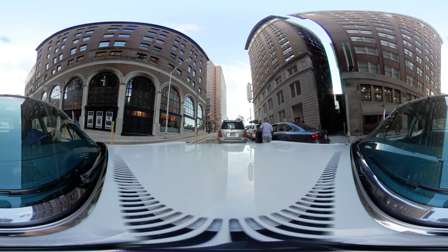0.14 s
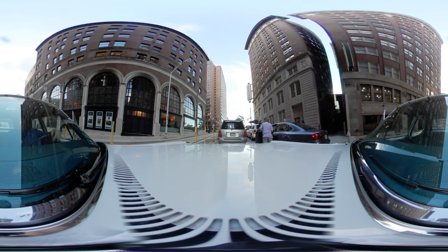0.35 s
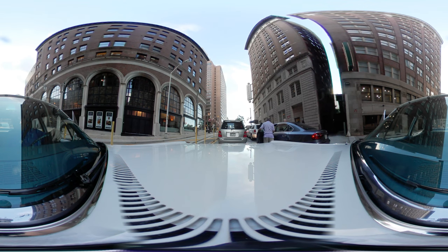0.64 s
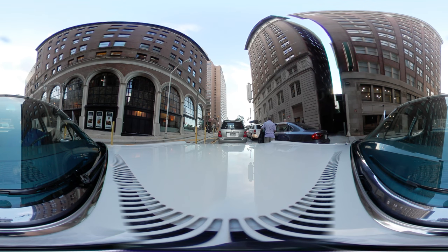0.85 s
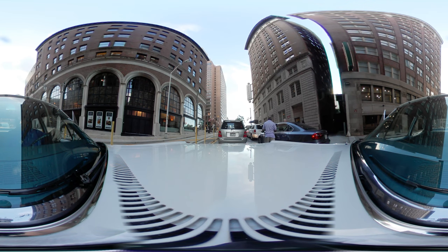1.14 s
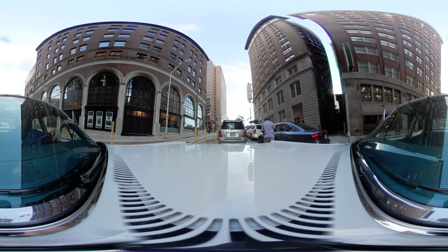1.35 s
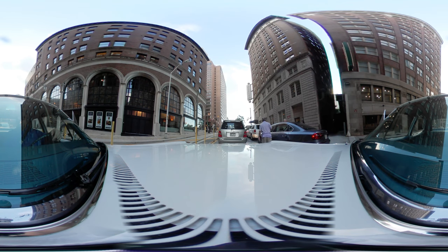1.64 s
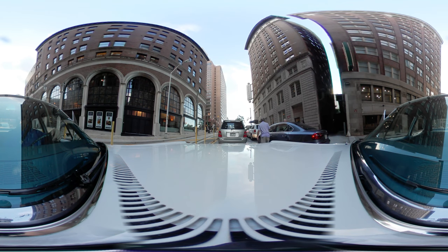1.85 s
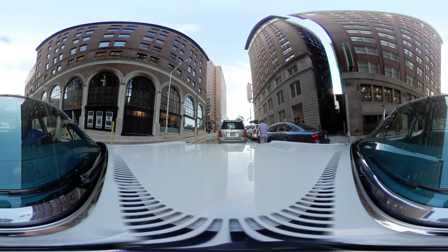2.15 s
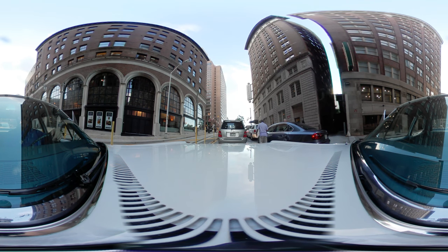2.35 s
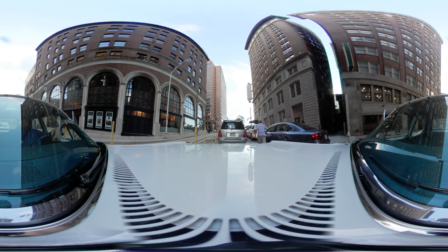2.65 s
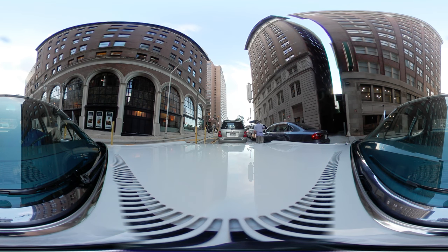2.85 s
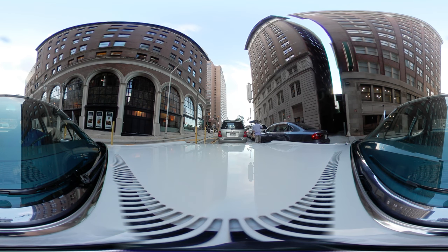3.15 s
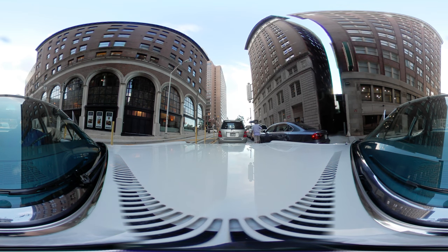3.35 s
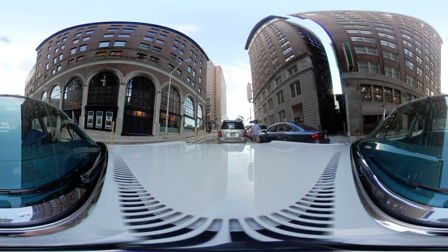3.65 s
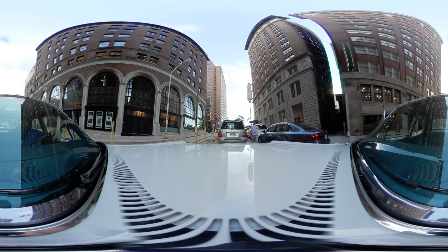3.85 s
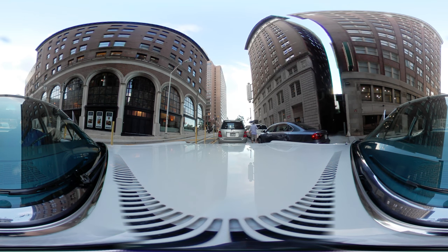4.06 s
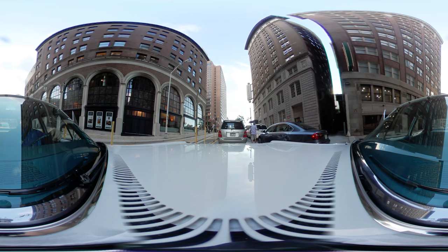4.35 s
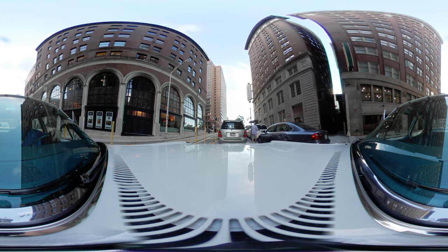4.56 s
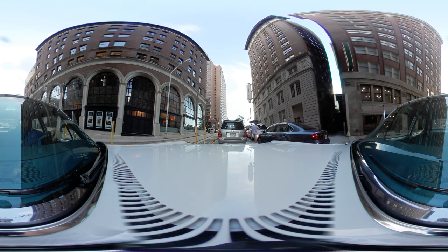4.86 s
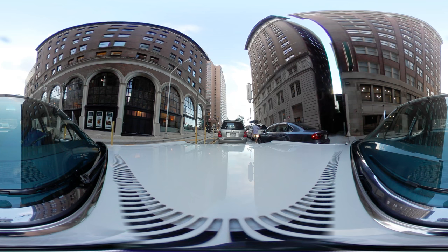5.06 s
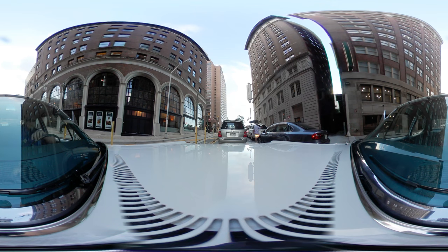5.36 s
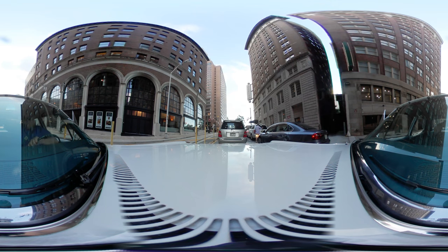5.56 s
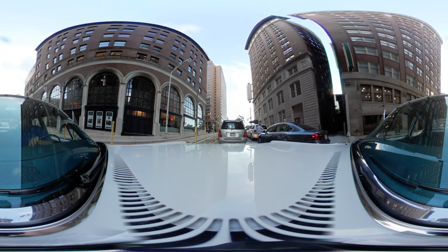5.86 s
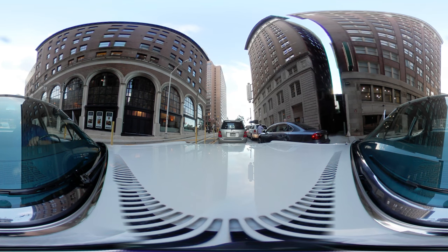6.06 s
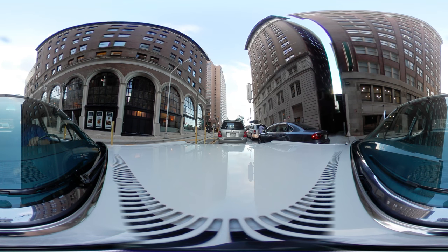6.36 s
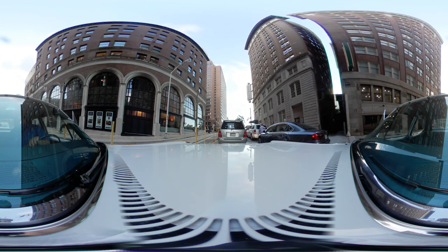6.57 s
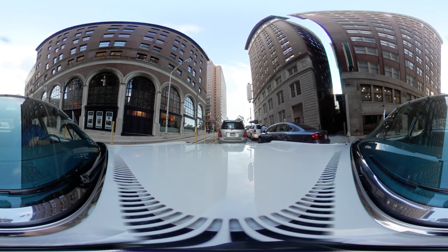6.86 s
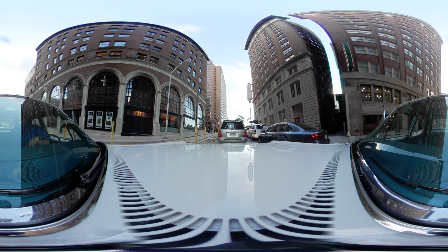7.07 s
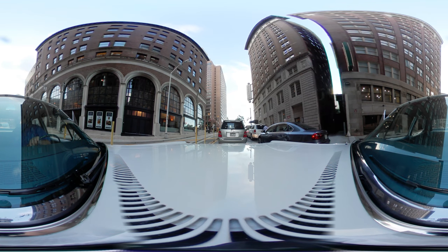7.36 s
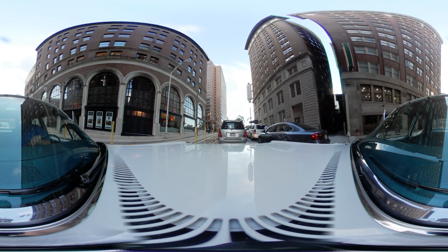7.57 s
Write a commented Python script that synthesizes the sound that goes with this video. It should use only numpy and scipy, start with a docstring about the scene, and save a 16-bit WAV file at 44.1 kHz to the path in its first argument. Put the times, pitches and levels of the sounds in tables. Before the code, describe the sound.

A rough eight-cylinder idle runs throughout, its speed hunting slightly. Low booming pulses, dull block clatter and rhythmic bright chuffs of leaking gas repeat, with small clinks and loose panel knocks. One hollow knock on the sheet metal comes near the start. Faint traffic engine hum and light breeze sit behind; two-port microphone very close on the hood, outdoors.

```python
"""Exhaust pulses boom unevenly: an old eight-cylinder engine idles roughly under the hood that carries
a two-port microphone. Firings ring pipe resonances over noise rumble; filtered noise clatters as the block;
one leaking bank puffs hiss and rings the manifold. Wavering sines hum as neighbouring cars and whine as a
charger, noise lumps buffet the ports as a breeze, damped sines clink and knock, and a tap thumps the hood."""
import sys
import numpy as np
from scipy import signal
from scipy.fft import rfft, irfft, next_fast_len
from scipy.io import wavfile
from scipy.ndimage import uniform_filter1d, map_coordinates

SR = 44100
rng = np.random.default_rng(int(sys.argv[2]) if len(sys.argv) > 2 else 0)


def attenuation_scalar(level_db):
    """Turn a level in dB into a linear amplitude multiplier (20 dB per decade)."""
    decades = np.asarray(level_db, float) / 20
    return 10 ** decades


def transcribe(u):
    """Save the signal u as a 16-bit wav file named by the first command-line argument.

    u: samples, shape (n,) or (channels, n), limited to [-1, 1]; the rate is SR.
    q: integer samples, one column per channel.
    """
    v = np.clip(np.atleast_2d(u).T, -1, 1)
    q = np.round(v * 32767).astype(np.int16)
    wavfile.write(sys.argv[1], SR, q)


N = 340893

# idle speed, hunting up and down: (time [s], crank speed [rpm])
IDLE_SPEED = [(-0.1, 399), (0.29, 424), (0.57, 400), (0.89, 428), (1.15, 392), (1.86, 418), (2.54, 396),
              (3.0, 422), (3.59, 386), (3.92, 441), (4.6, 381), (4.92, 420), (5.64, 416), (5.84, 389),
              (6.69, 430), (7.07, 443), (7.27, 405), (7.8, 405)]
FIRST_CYCLE_S = -.103
# cylinders in firing order: (relative push [dB])
CYLINDERS = [3.5, 1.5, 1.5, 2.5, -8.5, 2.5, -3, 0.5]

# combustion strength: (time [s], relative boom level [dB])
BURN = [(0, -16), (.3, -21.5), (1.19, -19), (1.49, -14.5), (1.78, -18), (2.38, -22), (2.97, -19),
        (3.87, -18.5), (4.46, -17.5), (4.76, -21), (5.05, -17.5), (5.95, -21), (6.24, -15.5), (6.54, -19),
        (6.84, -17), (7.14, -21), (7.73, -17)]
# exhaust pipe resonances: (frequency [Hz], width [Hz], relative level [dB])
PIPE = [(25.768, 8.956, -10.5), (55.8, 6, 0), (74.116, 10, -6), (143.19, 19.203, -9.5),
        (229.35, 18.563, -17), (362.87, 33.46, -25)]
# colour of low air and panel rumble: (frequency [Hz], relative density [dB per Hz])
RUMBLE = [(8.8, -40.5), (15, -82), (27, -11), (43, -10), (64, -4), (84, -2.5), (102, -8.5), (143, -7.5),
          (171, -12), (217, -11.5), (300, -22.5), (390, -25.5), (660, -120)]

# colour of block clatter: (frequency [Hz], relative density [dB per Hz])
BLOCK = [(150, -22), (260, -1.5), (333, -6.5), (368, -6), (443, -14), (553, -7.5), (691, -9), (930, -9.5),
         (1180, -14.5), (1420, -15), (1620, -16), (1770, -19.5), (2380, -17), (3150, -22), (3810, -32),
         (5000, -35), (6500, -45.5), (11000, -120)]
# narrow casting resonances: (frequency [Hz], width [Hz], relative level [dB])
CASTING = [(363, 20, 5), (540, 28, 3), (852, 28, 1), (936, 36, 4), (1617, 40, 3)]

# colour of leak hiss: (frequency [Hz], relative density [dB per Hz])
HISS = [(1760, -55.5), (3000, 2), (3840, -11), (4250, -6.5), (4940, -11), (5670, -8), (8600, -11.5),
        (11600, -8), (12300, -11.5), (15400, -24)]
# leaking bank: (place in firing order [-], hiss [dB], usual high ring [dB], usual low ring [dB]), all relative
BANK = [(0, -45, -38, -41), (1, -42, -34, -41.5), (3, -45, -33, -34), (6, -46.5, -36.5, -36.5)]
HISS_SCATTER_DB, BRIGHT_SCATTER_DB, RING_SCATTER_DB = 0.7726, 1.5, 3
# leaking firings that miss or puff harder: (time [s], hiss change [dB])
UNEVEN = [(.008, 3.5), (.192, 4.5), (.224, 1), (.298, 3), (.405, -20), (.81, 1.5), (.987, -30), (1.769, -3),
          (1.983, 1.5), (2.167, -25), (2.35, 2.5), (2.577, 2), (2.761, -17), (2.836, 2.5), (2.943, 3.5),
          (3.648, 2), (3.762, 2), (4.22, -19.5), (4.287, -5), (4.633, -4), (4.819, -17), (4.892, 3),
          (5.108, 3.5), (5.18, 3), (5.217, 3), (5.285, 2.5), (5.395, -21.5), (5.466, -10), (5.975, -8),
          (6.177, 2.5), (6.285, 3.5), (6.675, 2.5), (7.125, -5.5), (7.706, 3)]
# puffs that ping the manifold hard: (time [s], relative high ring [dB], relative low ring [dB])
PINGS = [(.008, -21, -34), (.298, -20.5, -23.5), (.592, -27.5, -37), (.81, -25, -45), (1.097, -27.5, -45.5),
         (1.173, -24.5, -27), (1.473, -25, -21.5), (1.66, -28, -40), (1.696, -26, -40), (1.769, -22.5, -46),
         (1.983, -26, -31.5), (2.055, -25, -45), (2.278, -45, -23.5), (2.35, -25, -45.5),
         (2.577, -26, -45.5), (2.651, -26.5, -21), (2.872, -25, -25.5), (2.943, -28, -23),
         (3.344, -26.5, -42), (3.457, -28.5, -45), (3.534, -19.5, -22.5), (3.762, -27.5, -27.5),
         (3.835, -21.5, -43), (4.111, -24.5, -24), (4.328, -27.5, -35), (4.402, -18, -22.5),
         (4.705, -44.5, -26), (4.892, -26.5, -44.5), (4.933, -27, -44), (5.004, -28, -32),
         (5.108, -28, -45.5), (5.285, -24, -37.5), (5.579, -22, -34), (5.868, -20.5, -22.5),
         (6.177, -24, -25), (6.285, -24.5, -31), (6.462, -25.5, -21.5), (6.573, -28.5, -22.5),
         (6.675, -28.5, -45.5), (6.745, -20.5, -22), (7.024, -27, -32.5), (7.308, -26.5, -24),
         (7.596, -24.5, -24)]
# upper manifold modes: (frequency [Hz], relative level [dB], swell [s], fade [s])
HIGH_RING = [(1620.5, -3, 0.004, 0.0055), (1496.3, -10.5, 0.004125, 0.00665), (2400, -13, 0.002, 0.005),
             (3150, -19, 0.0015, 0.004)]
# lower manifold modes: (frequency [Hz], relative level [dB], swell [s], fade [s])
LOW_RING = [(930.63, -6.5, 0.005, 0.016), (851, -10, 0.00441, 0.0483)]
# shrill edge tones of a puff: (frequency [Hz], relative level [dB], swell [s], fade [s])
WHISTLE = [(5592, -5.5, 0.002767, 0.012616), (6902.3, -9, 0.001905, 0.0073)]

# neighbouring engines and the charger: (frequency [Hz], relative level [dB], waver [Hz])
HUMS = [(36.0, -33, .1), (74.5, -28.5, 1.4), (120.1, -38, .2), (2017, -56, 2), (2352, -50, 1)]

# colour of buffeting: (frequency [Hz], relative density [dB per Hz])
BUFFET = [(8, -22), (15, 0), (37, 0), (160, -7), (470, -18), (900, -30), (1500, -55), (2600, -120)]
# eddies over the ports: (time [s], relative peak [dB], time to fall 20 dB [s])
GUSTS = [(.79, -21.5, 0.0454), (1.06, -26.5, 0.0476), (1.72, -29.5, 0.2145), (2.18, -31, 0.0004),
         (2.29, -33, 0.1537), (3.43, -24, 0.0359), (3.59, -28.5, 0.0814), (4.03, -27.5, 0.1621),
         (4.19, -23, 0.1064), (4.43, -29, 0.1373), (4.52, -23.5, 0.193), (4.78, -23, 0.2235),
         (5.6, -26, 0.0757), (5.74, -24.5, 0.0894), (6.3, -38.5, 0.5), (6.92, -27.5, 0.1083),
         (7.2, -25, 0.2485)]

# light clinks in the valve gear: (time [s], relative peak [dB], frequency [Hz])
CLINKS = [(0.1935, -27, 2131), (0.8121, -29, 2412), (1.6736, -33.5, 2342), (2.5825, -29, 2463),
          (2.8664, -32.5, 2161), (4.0073, -30, 2347), (4.0482, -33.5, 2037), (4.5894, -33, 2340),
          (5.0833, -31, 2012), (5.5179, -31, 2100), (6.6593, -33, 2350), (6.8723, -32, 2360)]
# loose parts on body panels: (time [s], relative peak [dB], frequency [Hz])
KNOCKS = [(.705, -14, 300), (1.6485, -10, 360), (2.008, -14, 317.8), (2.546, -16, 473.5), (3.612, -19, 415),
          (4.119, -9, 260), (5.083, -17, 420), (5.177, -16, 251.3), (5.823, -17, 360), (6.129, -20, 365),
          (6.684, -18, 250.4), (7.047, -20, 371), (7.331, -17, 360), (7.64, -21, 365)]

# knuckle on the hood: (time [s], relative level [dB])
TAPS = [(1.4045, 0)]
# hood panel modes: (frequency [Hz], relative level [dB], t60 [s], first swing [sign])
HOOD = [(27, -14, .45, -1), (74, -18, .4, 1), (104, -7, .4, 1), (150, -16, .35, 1), (230, -18, .3, 1),
        (310, -23, .12, 1)]
# short contact tones: (frequency [Hz], relative level [dB])
KNUCKLE = [(520, -15), (780, -9), (1100, -13), (1600, -21), (2050, -21)]

# nominal likeness of the two ports: (frequency [Hz], correlation [-])
ALIKE = [(43, .955), (90, .965), (170, .93), (300, .93), (520, .95), (700, .86), (860, .87), (1200, .36),
         (2000, .66), (3000, .83), (3900, .6), (4700, .25), (9000, .18)]
# port colour: (frequency [Hz], left minus right [dB])
TILT = [(60, -.5), (200, -.3), (500, .4), (1000, 1.2), (2400, 2.7), (4500, 1.6), (8000, 3.6), (13000, .6)]
LEFT_LEAD_S, TOP_HZ = 0.00015074, 15500


def unit(x):
    """Scaled to rms 1."""
    return x / np.sqrt(np.mean(x ** 2) + 1e-20)


def along(points, hz):
    """(Hz, value) points interpolated on a log axis."""
    f, v = np.transpose(points)
    return np.interp(np.log(hz + 1), np.log(f + 1), v)


def wobble(rate_hz):
    """Smooth random curve, rate_hz knots a second."""
    knots = rng.standard_normal(int(N * rate_hz / SR) + 4)
    return map_coordinates(knots, [np.arange(N) * rate_hz / SR])


def filtered(x, response):
    """x times a complex response of frequency."""
    m = next_fast_len(N + SR // 2)
    return irfft(rfft(x, m) * response(np.fft.rfftfreq(m, 1 / SR)), m)[..., :N]


def resonances(modes):
    """Response of causal resonances summed with alternating signs."""
    def response(f):
        total = 0
        for k, (hz, width_hz, db) in enumerate(modes):
            damping = 1j * f * width_hz
            total = total + (-1) ** k * attenuation_scalar(db) * damping / (hz * hz - f * f + damping)
        return total
    return response


def spikes(s, size):
    """Impulses of the given sizes at the given times."""
    at = np.round(np.asarray(s) * SR).astype(int)
    keep = (at >= 0) & (at < N)
    return np.bincount(at[keep], np.asarray(size)[keep], N)


def ports(common, apart):
    """A source at both ports: a direct part plus a diffuse part of opposite sign."""
    def turn(hz):
        return np.arccos(np.clip(along(ALIKE, hz), 0, 1)) / 2
    mid = filtered(common, lambda hz: np.cos(turn(hz)))
    side = filtered(apart, lambda hz: np.sin(turn(hz)))
    return np.array([mid + side, mid - side])


def rush(spectrum, patchy_db):
    """Two unrelated noises of one colour, rms 1, whose narrow bands flare by patchy_db."""
    z = signal.stft(rng.standard_normal((2, N)), nperseg=512)[2]
    field = uniform_filter1d(rng.standard_normal(z.shape[1:]), size=3, axis=0)
    field = uniform_filter1d(field, size=5, axis=1)
    pair = signal.istft(z * attenuation_scalar(patchy_db * unit(field)), nperseg=512)[1][:, :N]
    return unit(filtered(pair, lambda hz: attenuation_scalar(along(spectrum, hz))))


def cycles():
    """Times and four-stroke cycles completed by then; a cycle is two crank turns."""
    t = np.arange(FIRST_CYCLE_S, N / SR, 1 / 1000)
    cycles_per_s = np.interp(t, *np.transpose(IDLE_SPEED)) / 120
    return t, np.cumsum(cycles_per_s) / 1000


def firings(jitter_s, scatter_db):
    """Eight pushes a cycle, uneven in time and strength."""
    s, turns = cycles()
    slot = np.arange(int(len(CYLINDERS) * turns[-1]))
    chance = rng.standard_normal((len(slot), 2))
    when = np.interp(slot / len(CYLINDERS), turns, s) + jitter_s * chance[:, 0]
    push_db = np.take(CYLINDERS, slot % len(CYLINDERS)) + scatter_db * chance[:, 1]
    return spikes(when, attenuation_scalar(push_db))


def throb(pushes, share, fade_s):
    """Gain of rms 1; the given share of its power jumps at each firing and fades."""
    fade = np.exp(-np.arange(SR // 10) / SR / fade_s)
    kick = signal.fftconvolve(pushes ** 2, fade)[:N]
    return np.sqrt(1 - share + share * np.abs(kick) / np.mean(kick))


def exhaust(pushes):
    """Firing pulses ring the pipes over a turbulent rumble."""
    boom_db = np.interp(np.arange(N) / SR, *np.transpose(BURN))
    rumble_db = -24.5 + 0.6 * wobble(2.9958)
    late = filtered(pushes, lambda hz: np.exp(-2j * np.pi * hz * 0.0060307))  # travel along the pipe [s]
    boom = attenuation_scalar(boom_db - 2.6) * unit(filtered(late, resonances(PIPE)))
    air = rush(RUMBLE, patchy_db=0)
    low = filtered(air, lambda hz: 1 / (1 + (hz / 97) ** 8))
    high = (air - low) * throb(pushes, share=0.4, fade_s=0.02)
    rumble = attenuation_scalar(boom_db - 10) * unit(low[0]) + attenuation_scalar(rumble_db - 3) * unit(high[0])
    diffuse = attenuation_scalar(boom_db) * unit(low[1]) + attenuation_scalar(rumble_db) * unit(high[1])
    return ports(boom + rumble, diffuse)


def block(pushes):
    """Valve gear and belts clatter in the castings, in uneven grains that swell with each firing."""
    casting = resonances(CASTING)
    noise = filtered(rush(BLOCK, patchy_db=1.5), lambda hz: 1 + 0.6863 * np.abs(casting(hz)))
    grain = attenuation_scalar(1.0598 * wobble(60)) * throb(pushes, share=0.2, fade_s=0.03)
    return attenuation_scalar(-28) * ports(*unit(noise * grain))


def puffs():
    """Time, hiss, brightness and ring levels of each firing in the leaking bank."""
    t, turns = cycles()
    count = int(turns[-1]) + 1
    place, hiss_db, high_db, low_db = np.tile(np.transpose(BANK), count)
    turn = np.repeat(np.arange(count), len(BANK)) + np.round(place) / len(CYLINDERS)
    s = np.interp(turn, turns, t)
    chance = rng.standard_normal((len(s), 4)).T
    hiss_db = hiss_db + HISS_SCATTER_DB * chance[0]
    bright_db = BRIGHT_SCATTER_DB * chance[1]
    high_db, low_db = [high_db, low_db] + RING_SCATTER_DB * chance[2:]

    def nearest(at):
        return np.abs(s - at).argmin()
    for at, change_db in UNEVEN:
        hiss_db[nearest(at)] += change_db
    for at, high, low in PINGS:
        high_db[nearest(at)], low_db[nearest(at)] = high, low
    keep = (s >= 0) & (turn < turns[-1])
    return np.array([s, hiss_db, bright_db, high_db, low_db])[:, keep]


def manifold(s, db, modes, spread):
    """Each puff excites the modes at slightly new pitches and strengths, as in ringing cast iron."""
    t = np.arange(SR // 10) / SR
    out = np.zeros(N + SR)
    starts = np.round(s * SR).astype(int)
    for hz, mode_db, swell_s, fade_s in modes:
        chance = rng.standard_normal((len(s), 3))
        swell = (1 - np.exp(-t / swell_s)) ** 2 * np.exp(-t / fade_s)
        swell = swell / swell.max()
        for at, level_db, (bend, turn, size) in zip(starts, db, chance):
            ring = np.sin(2 * np.pi * hz * (1 + spread * bend) * t + np.pi * turn)
            out[at:at + len(t)] += attenuation_scalar(level_db + mode_db + 1.2 * size) * swell * ring
    return out[:N]


def leak():
    """Gas jets out briefly around each firing of one bank, over a steady seep, and rings the manifold."""
    s, hiss_db, bright_db, high_db, low_db = puffs()
    t = np.arange(SR // 4) / SR
    jet = (1 - np.exp(-t / 0.00089)) * (np.exp(-(t / 0.036) ** 2.2) + 0.8 * np.exp(-t / 0.16767))

    def flow(db):  # puffs add in power
        return np.abs(signal.fftconvolve(spikes(s - .002, attenuation_scalar(2 * db)), jet ** 2)[:N])
    gas = rush(HISS, patchy_db=3.5)
    top = filtered(gas, lambda hz: 1 / (1 + (8200 / (hz + 1)) ** 6))
    # second term: power of the seep
    dull = np.sqrt(flow(hiss_db - bright_db / 2 - 2.2) + attenuation_scalar(2 * -52))
    sharp = np.sqrt(flow(hiss_db + bright_db / 2 - 1.6) + attenuation_scalar(2 * -55))
    hiss = attenuation_scalar(1.5604 * wobble(150)) * dull * (gas - top)
    hiss = hiss + attenuation_scalar(2 * wobble(600)) * sharp * top
    high_ring = manifold(s, high_db, HIGH_RING, spread=0.02)
    low_ring = manifold(s + 0.002, low_db, LOW_RING, spread=0.015087)
    whistle = manifold(s, hiss_db, WHISTLE, spread=.1)
    return ports(*hiss) + high_ring + low_ring + whistle


def hums():
    """Nearly steady tones whose pitch and size waver a little."""
    t = np.arange(N) / SR
    out = np.zeros(N)
    for hz, db, waver_hz in HUMS:
        turns = hz * t + np.cumsum(waver_hz * wobble(2)) / SR + rng.random()
        size = np.sqrt(2) * attenuation_scalar(db + 1.5 * wobble(5))
        out += size * np.sin(2 * np.pi * turns)
    return out


def wind():
    """Eddies strike each port on its own; the upper tones come in sudden lumps."""
    t = np.arange(N) / SR
    gust = attenuation_scalar(-51)  # calm between eddies
    for s, db, fall_s in GUSTS:
        gust = gust + attenuation_scalar(db - 20 * np.abs(t - s) / fall_s)
    lumps = unit(attenuation_scalar(4 * np.array([wobble(60), wobble(60)])))
    air = rush(BUFFET, patchy_db=0)
    low = filtered(air, lambda hz: 1 / (1 + (hz / 120) ** 4))
    return np.sqrt(2) * gust * (low + (air - low) * lumps)


def rattle(rows, cycles_t60, edge_db, dull_hz):
    """Small blows: a ring that falls 60 dB in cycles_t60 cycles, with a short noisy edge."""
    t = np.arange(SR // 10) / SR
    out = np.zeros(N + SR)
    for s, db, hz in rows:
        ring = attenuation_scalar(-60 * t * hz / cycles_t60) * np.sin(2 * np.pi * hz * t)
        edge = attenuation_scalar(edge_db - 60 * t / .012) * rng.standard_normal(len(t))
        out[round(s * SR):][:len(t)] += attenuation_scalar(db) * (ring + edge)
    return filtered(out[:N], lambda f: 1 / (1 + 1j * f / dull_hz) ** 3)


def tap():
    """A knuckle cracks on the hood; the panel booms and shudders."""
    t = np.arange(SR // 2) / SR
    boom = sum(way * attenuation_scalar(db - 60 * t / t60_s) * np.sin(2 * np.pi * hz * t) for hz, db, t60_s, way in HOOD)
    shudder = unit(filtered(rng.standard_normal(N), resonances([(170.9, 75.95, 0)])))[:len(t)]
    boom = boom + attenuation_scalar(-17 - 60 * t / .35) * (1 - np.exp(-t / 0.01212)) * shudder
    click = -attenuation_scalar(-60 * t / .022) * sum(attenuation_scalar(db) * np.sin(2 * np.pi * hz * t) for hz, db in KNUCKLE)
    crack = attenuation_scalar(-14 - 60 * t / .045) * rng.standard_normal(len(t))
    s, db = np.transpose(TAPS)

    def hit(early_s, ring):
        return signal.fftconvolve(spikes(s - early_s, attenuation_scalar(db)), ring)[:N]
    knock = hit(0, boom) + hit(.0007, click + crack)
    return filtered(knock, lambda hz: 1 / (1 + 1j * hz / 3000) ** 4)  # soft flesh, little treble


def scene():
    """Engine, street, breeze, loose parts and tap at the two ports."""
    pushes = firings(jitter_s=.0012, scatter_db=1.5)
    engine = exhaust(pushes) + block(pushes) + leak()
    clinks = rattle(CLINKS, cycles_t60=60, edge_db=-6, dull_hz=4500)
    knocks = rattle(KNOCKS, cycles_t60=6, edge_db=0, dull_hz=1700)
    return engine + hums() + wind() + clinks + knocks + tap()


def low_pass(x):
    """Removes everything above the highest recorded frequency."""
    return signal.sosfilt(signal.butter(12, 15520, fs=SR, output="sos"), x)


def record(dry):
    """Sound reaches the left port first; the ports differ slightly in colour and stop at TOP_HZ."""
    side = np.array([[1], [-1]])

    def port_response(hz):
        colour = attenuation_scalar(side * along(TILT, hz) / 2)
        lead = np.exp(1j * np.pi * side * hz * LEFT_LEAD_S)  # half the lead on each side
        return (hz < TOP_HZ) * colour * lead
    mix = filtered(dry, port_response)
    return low_pass(mix)


dry = scene()
out = record(dry)
transcribe(out)
```